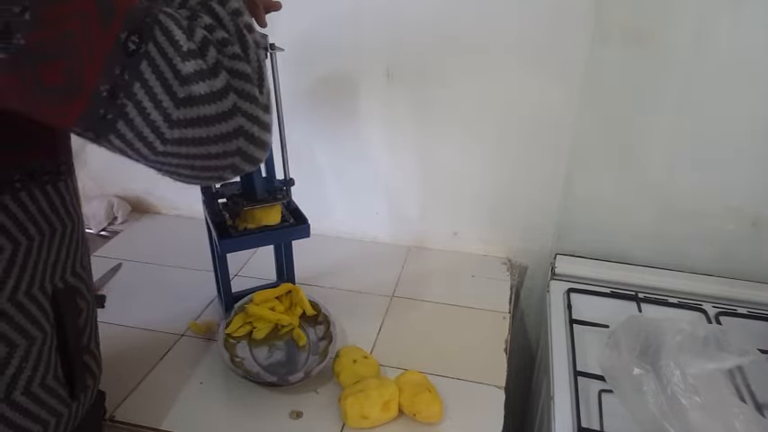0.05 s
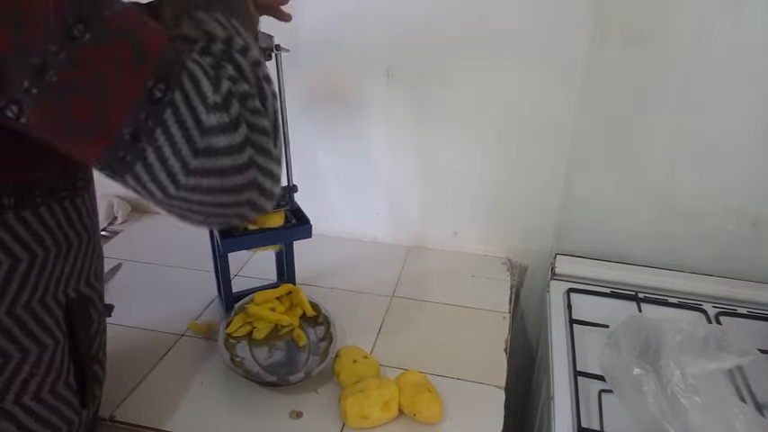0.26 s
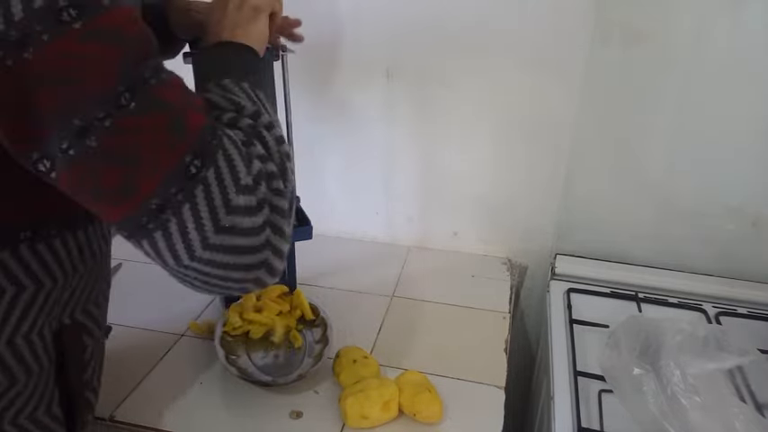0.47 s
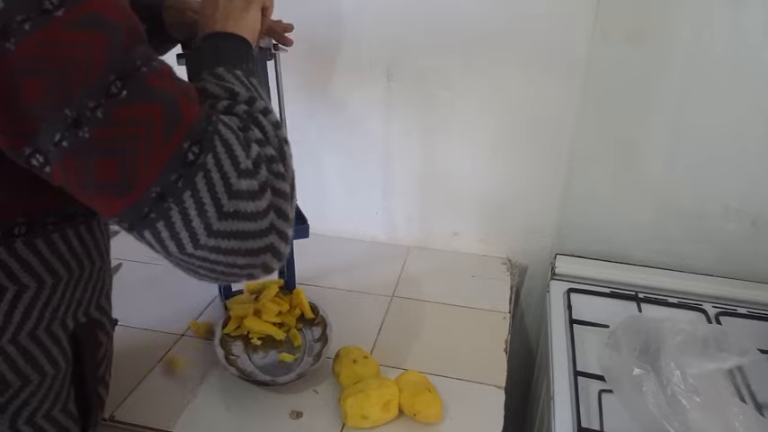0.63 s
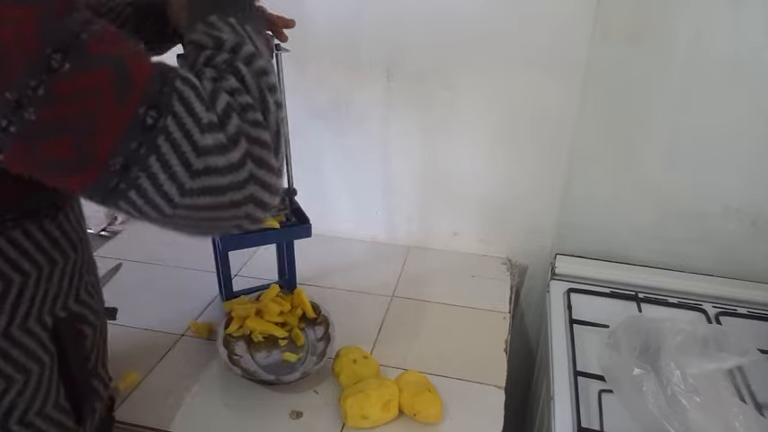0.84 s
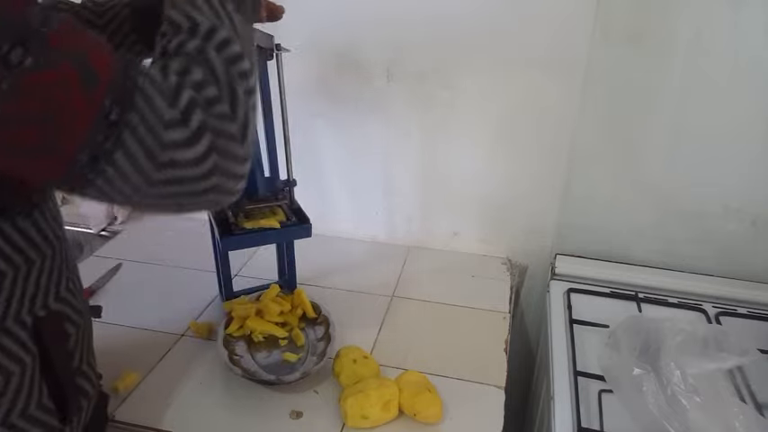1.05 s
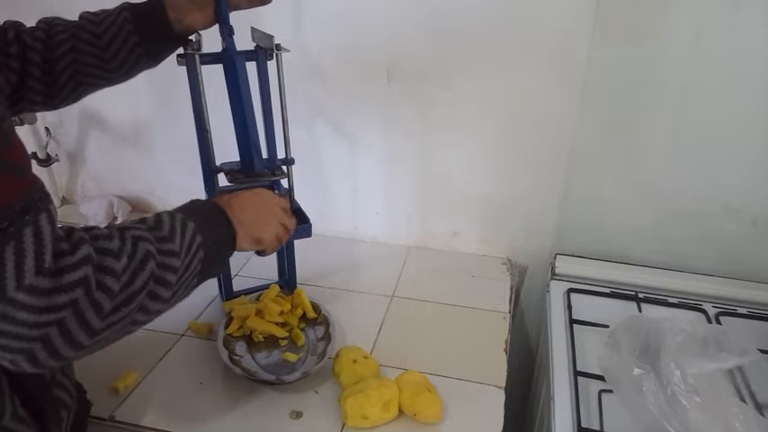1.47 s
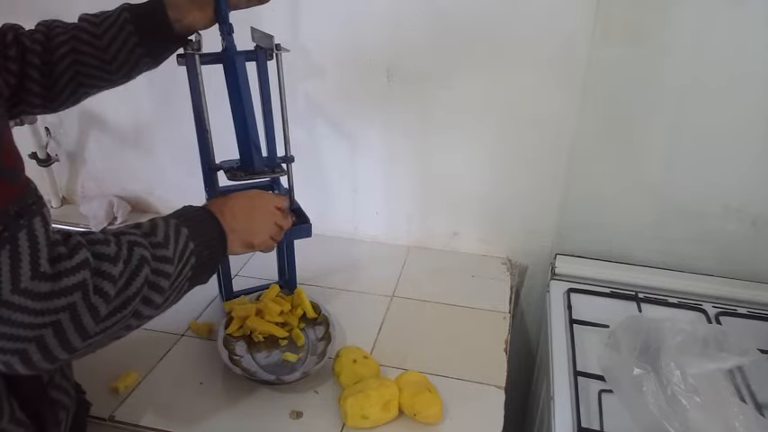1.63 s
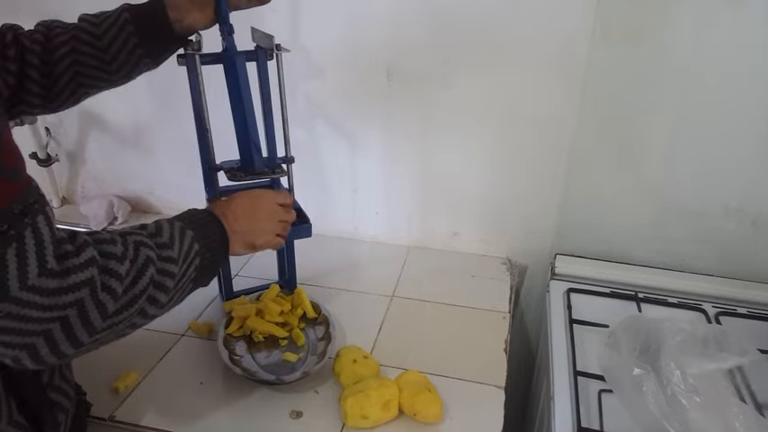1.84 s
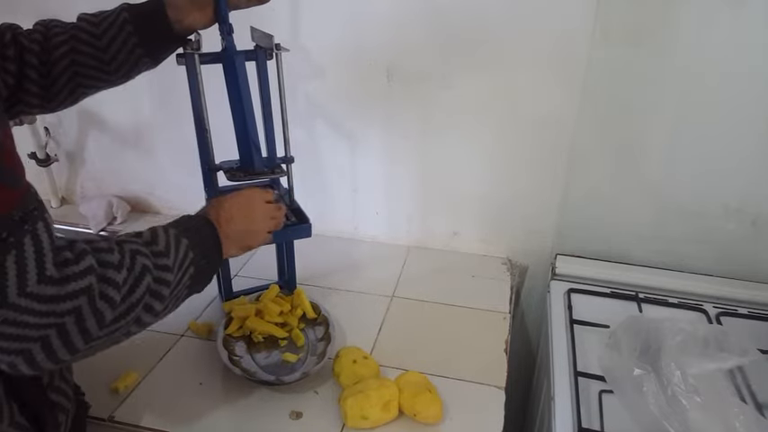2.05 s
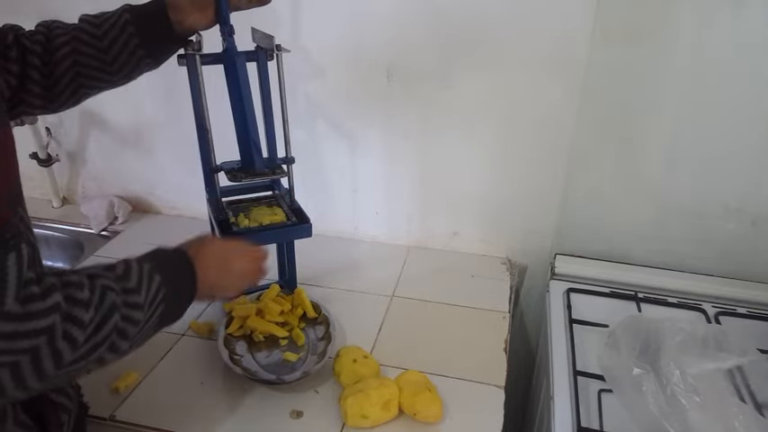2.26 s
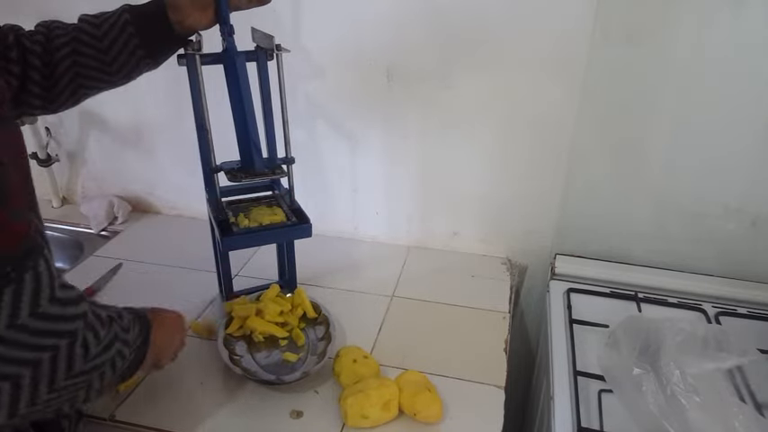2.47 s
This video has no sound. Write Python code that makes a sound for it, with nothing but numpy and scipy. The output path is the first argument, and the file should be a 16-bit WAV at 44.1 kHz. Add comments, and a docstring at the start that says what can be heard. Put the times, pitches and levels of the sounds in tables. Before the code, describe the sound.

A steel lever slicer forces a potato through its blades with a wet crunch and a thud. Chips drop into a steel bowl, then the lever lifts with a knock, bright click and scrape. An appliance hums faintly in the kitchen.

```python
"""A wet crunch over a groaning frame: a steel lever slicer forces a potato through its blade grid.
The blades ring, the pusher slams home and the chips drop into a steel bowl. The lever lifts with a
knock and a bright click, the pusher scraping up its singing guide rods; a hand picks at the wet slices.
A mains appliance hums throughout in the tiled kitchen."""
import sys
import numpy as np
from scipy import signal
from scipy.fft import rfft, irfft, next_fast_len
from scipy.io import wavfile
from scipy.ndimage import map_coordinates

SR = 44100
rng = np.random.default_rng(int(sys.argv[2]) if len(sys.argv) > 2 else 0)


def generate_wav(sig):
    """Save sig (samples, or channels by samples) to the path in sys.argv[1] as 16-bit PCM at SR."""
    pcm = np.round(np.clip(np.atleast_2d(sig).T, -1, 1) * 32767).astype(np.int16)
    wavfile.write(sys.argv[1], SR, pcm)


N = 110250
TIME = np.arange(N) / SR


def amp(db):
    """Decibels to gain."""
    return 10 ** (np.asarray(db) / 20)


def unit(x):
    """Scale to rms 1."""
    return x / np.sqrt(np.mean(x ** 2) + 1e-20)


def along(points, hz):
    """Read (f/Hz, value) points on a log frequency axis."""
    f, values = np.transpose(points)
    return np.interp(np.log(hz + 1), np.log(f + 1), values)


def curves(rows):
    """One automation curve for each column after the time."""
    times, *columns = np.transpose(rows)
    return [np.interp(TIME, times, column) for column in columns]


def gate(rows, release_s):
    """Opens at the first row; after the last it falls 60 dB per release_s."""
    return (TIME >= rows[0][0]) * amp(-60 * np.maximum(TIME - rows[-1][0], 0) / release_s)


def wobble(rate):
    """A smooth random curve, rate knots a second."""
    return map_coordinates(rng.standard_normal(int(N * rate / SR) + 4), [np.arange(N) * rate / SR])


def grains(per_s, scatter_db):
    """Random tiny ruptures or slips of uneven size."""
    ticks = (rng.random(N) < per_s / SR) * rng.choice([-1, 1], N)
    return unit(ticks * amp(scatter_db * np.clip(rng.standard_normal(N), -2, 2)))


def colour(x, eq):
    """Minimum-phase EQ through (f/Hz, level/dB) points."""
    size = 2 * next_fast_len(N)
    cepstrum = irfft(np.log(amp(along(eq, np.fft.rfftfreq(size, 1 / SR)))), size)
    cepstrum[1:size // 2] *= 2
    cepstrum[size // 2 + 1:] = 0
    return irfft(rfft(x, size) * np.exp(rfft(cepstrum)), size)[..., :x.shape[-1]]


def spread(pair):
    """Two unrelated signals as a diffuse field: narrow bass, wide treble."""
    # stereo width: f/Hz, side over mid/dB
    width = [(60, -19), (150, -12.5), (300, -7.5), (600, -5), (1200, -1), (4000, 0), (12000, 1.5)]
    side = colour(pair[1], width)
    return np.array([pair[0] + side, pair[0] - side]) / np.sqrt(2)


def kitchen(x, early_db, early_s, room_db):
    """Direct sound, a dense cluster of near reflections and the room's tail."""
    # reverb decay: f/Hz, t60/s
    room_t60 = [(100, 0.66), (250, 0.72), (600, .52), (1500, 0.31), (4000, 0.38), (12000, 0.25)]
    size = SR * 3 // 4
    t = TIME[:size]
    hz, frame_s, spectra = signal.stft(rng.standard_normal((2, size)), SR, nperseg=256)
    decay = amp(-60 * frame_s / along(room_t60, hz)[:, None])
    tail = signal.istft(spectra * decay, SR, nperseg=256)[1][:, :size]
    tail *= 1 - np.exp(-t / .006)
    near = rng.standard_normal((2, size)) * amp(-60 * t / early_s)
    response = spread(amp(room_db) * tail / np.linalg.norm(tail[0])
                      + amp(early_db) * near / np.linalg.norm(near[0]))
    response[:, 0] += 1  # direct sound
    response /= np.sqrt(np.sum(response ** 2) / 2)
    return signal.fftconvolve(x[None], response, axes=1)[:, :N]


def shifting_reflections(x, start_s, end_s, count, **room):
    """Crossfades through count random patterns of reflections, so the crunch has no fixed metallic ring."""
    blend = np.interp(TIME, [start_s, end_s], [0, count - 1])
    return sum(kitchen(x * np.sqrt(np.maximum(1 - abs(blend - k), 0)), **room) for k in range(count))


def blows(hits, eq, gain_db, **room):
    """Each contact is one sharp push, dispersed and coloured by what is struck."""
    pushes = np.zeros((2, N))
    for start_s, db in hits:
        push = np.zeros(N)
        push[int(start_s * SR)] = amp(db + gain_db)
        pushes += kitchen(push, **room)
    dispersion = .6  # all-pass: the lows trail the treble in the steel
    return colour(signal.lfilter([-dispersion, 1], [1, -dispersion], pushes), eq)


def ring(modes, start_s, rough_rad):
    """Decaying modes with unsteady phase, two slightly detuned sets spread in stereo."""
    t = np.maximum(TIME - start_s, 0)
    pair = np.zeros((2, N))
    for voice in pair:
        for hz, db, t60 in modes:
            detuned_hz = hz * (1 + rng.normal(0, .0018))
            phase = 2 * np.pi * detuned_hz * t + rough_rad * wobble(50)
            voice += amp(db - 60 * t / t60) * np.sin(phase)
    return spread(pair) * (1 - np.exp(-t / .0089))


def frame_note(rows, rough_rad, flutter_db):
    """A low resonance of the frame, driven unevenly by friction."""
    hz, db = curves(rows)
    envelope = gate(rows, release_s=.9) * amp(db + flutter_db * wobble(35))
    phase = 2 * np.pi * np.cumsum(hz) / SR + rough_rad * wobble(45)
    return np.sqrt(2) * envelope * np.sin(phase)


def room_tone():
    """Room air and the slightly unsteady hum of an appliance."""
    # hum partials: f/Hz, level/dB
    partials = [(53.8, -74.5), (150.7, -65), (296.1, -70.5), (344.5, -65.5), (393.0, -67.5), (441.4, -66.5),
                (489.9, -73), (2751, -86), (5109, -91), (5502, -98.5), (6191, -89.5), (7418, -90.5)]
    # air spectrum: f/Hz, level/dB
    air_eq = [(20, -38), (38, -21.5), (55, 1), (80, -11.5), (115, -6.5), (150, -9), (200, -4), (260, -11),
              (340, -13.5), (450, -7.5), (540, -17), (780, -14), (1030, -21.5), (1350, -17), (1730, -33),
              (2800, -30), (3800, -38.5), (6000, -33.5), (8000, -34), (9200, -43), (15800, -37)]
    hum = np.zeros(N)
    for hz, db in partials:
        level = np.sqrt(2) * amp(db + wobble(4.3))
        phase = 2 * np.pi * (hz * TIME + rng.random()) + .2 * wobble(9.5)
        hum += level * np.sin(phase)
    air = unit(spread(colour(rng.standard_normal((2, N)), air_eq)))
    return amp(.5) * hum + amp(-62) * air


def rod_scrape():
    """The pusher slides along its rods in a stream of tiny slips."""
    # scrape envelope: t/s, level/dB
    slide = [(0, -51.5), (.12, -68), (.19, -62), (.5, -45), (.58, -54), (.7, -51.5), (.78, -58),
             (.83, -52.5), (1.06, -46), (1.14, -59), (1.22, -59.5), (1.28, -57), (1.38, -59.5),
             (1.62, -66.5), (2.18, -71.5), (2.29, -61), (2.5, -77.5)]
    # rod spectrum: f/Hz, level/dB
    eq = [(500, -0.5), (750, 0), (1400, -4.5), (1600, 1), (1800, -1), (2100, -4), (2600, -6.5), (3300, -13),
          (4200, -17), (8000, -19), (12000, -51)]
    db, = curves(slide)
    slips = unit(colour(grains(per_s=6000, scatter_db=3), eq))
    return kitchen(amp(db + 1) * slips, early_db=12, early_s=.073, room_db=8)


def rod_song():
    """Rubbing feeds two bending modes of a guide rod; they drift as the pusher travels."""
    # first mode: t/s, f/Hz, level/dB
    glide = [(0, 1920, -57), (.1, 1850, -60), (.19, 1983, -87), (.75, 1768, -95), (.81, 1740, -51),
             (.86, 1803, -78), (1.0, 1804, -46), (1.12, 1850, -62), (1.2, 1710, -77), (1.275, 1709, -59.5),
             (1.37, 1860, -67.5), (1.5, 1996, -70.5), (1.65, 2000, -91)]
    overtone_ratio, overtone_db = 1.85, -8
    hz, db = curves(glide)
    phase = 2 * np.pi * np.cumsum(hz) / SR
    rubbed = lambda p: wobble(90) * np.cos(p) + wobble(90) * np.sin(p)
    pair = [rubbed(phase) + amp(overtone_db) * rubbed(overtone_ratio * phase) for _ in range(2)]
    return amp(db) * unit(spread(pair))


def rod_clinks():
    """The rod clinks in its guide."""
    # contacts: t/s, level/dB
    hits = [(.0238, -27), (.1007, -25.5), (.8061, -20.5)]
    # clink spectrum: f/Hz, level/dB
    eq = [(500, -28.5), (1150, -2), (1600, -17.5), (1900, 7.5), (2150, -15.5), (2600, -2.5), (3000, -26.5),
          (3600, -10), (4300, -23), (8000, -38), (15000, -45.5)]
    return blows(hits, eq, gain_db=16.5, early_db=11, early_s=.03, room_db=7.5)


def frame_rumble():
    """The stand shudders on the counter as the lever moves."""
    # shudder envelopes: t/s, boom level/dB, body level/dB
    shudder = [(.222, -52, -44), (.24, -37, -28.5), (.29, -39, -40.5), (.35, -38.5, -35),
               (.402, -39, -24.5), (.445, -43.5, -31.5), (.475, -40, -29), (.51, -35.5, -31.5),
               (.56, -50, -40.5), (.63, -51, -43), (.69, -45.5, -41.5), (.82, -56.5, -52.5),
               (.9, -54.5, -44), (1.02, -53, -42.5), (1.12, -59, -48.5), (1.23, -65, -58.5),
               (1.31, -61.5, -54.5), (1.6, -71, -66.5)]
    # deep boom: f/Hz, level/dB
    boom_eq = [(25, -40), (42, -21), (55, -5), (95, 13.5), (130, 7.5), (200, -41)]
    # low-mid body: f/Hz, level/dB
    body_eq = [(110, -52), (190, -1.5), (250, 0.5), (320, -0.5), (400, -9.5), (580, -9), (760, -22),
               (1400, -47.5)]
    boom_db, body_db = curves(shudder)
    shake = lambda eq: unit(spread(colour(np.array([grains(900, 4.5), grains(900, 3)]), eq)))
    boom = amp(boom_db - 2.5) * shake(boom_eq)
    body = amp(body_db - 1) * shake(body_eq)
    return (boom + body) * gate(shudder, release_s=.63)


def knocks():
    """Dull knocks: the pusher meets the potato, later the lever shifts in its loose joint."""
    # contacts: t/s, level/dB
    hits = [(.2250, -16), (.2370, -12.5), (.8617, -24), (.873, -13), (.8765, -13.5), (.8795, -9.5),
            (.886, -10.5)]
    # knock spectrum: f/Hz, level/dB
    eq = [(150, -26), (300, -9.5), (410, 9.5), (480, -6), (590, 10), (720, -0.5), (1000, 5), (1330, 2.5),
          (1500, -3.5), (1850, 0), (2400, -1.5), (2900, -7.5), (3500, -16.5), (4800, -22), (6200, -31),
          (8200, -28), (9500, -51), (15000, -47)]
    return blows(hits, eq, gain_db=17, early_db=10, early_s=.033, room_db=7.5)


def potato_crunch():
    """Cells tear and spit as the potato moves through the blades."""
    # crunch envelopes: t/s, tear level/dB, fizz level/dB
    cut = [(0.225, -53, -63.5), (0.234, -35, -44), (.256, -41.5, -43), (.3, -37.5, -43),
           (.335, -31.5, -44.5), (.365, -30, -38), (0.395, -32, -36.5), (0.406, -26.5, -30.5),
           (0.427, -35, -43.5), (.458, -43.5, -38.5)]
    # tearing flesh: f/Hz, level/dB
    tear_eq = [(300, -2.5), (550, -9), (850, -8.5), (1250, -1.5), (1750, 2), (2500, -1), (3400, -2),
               (4600, -14.5), (6000, -22.5), (8000, -35.5), (10500, -41)]
    # wet fizz: f/Hz, level/dB
    fizz_eq = [(2600, -31.5), (4500, -1.5), (6000, -6), (7000, -0.5), (8400, -4.5), (9300, -14.5),
               (11000, -15.5), (14600, -15), (15800, -20)]
    tear_db, fizz_db = curves(cut)
    tear = amp(tear_db - 1.5) * unit(colour(grains(per_s=1500, scatter_db=4), tear_eq))
    fizz = amp(fizz_db + 1.5) * unit(colour(grains(per_s=4000, scatter_db=5), fizz_eq))
    crunch = (tear + fizz) * gate(cut, release_s=.31)
    return shifting_reflections(crunch, cut[0][0], cut[-1][0], count=6,
                                early_db=8.5, early_s=.03, room_db=7)


def frame_groan():
    """The frame groans under the load of the cut."""
    # groan: t/s, f/Hz, level/dB
    glide = [(.228, 150.1, -40), (.262, 157, -35), (.31, 146.8, -32), (.36, 152.4, -38), (.42, 155.5, -33),
             (.48, 143.4, -39), (.56, 139.6, -47)]
    return frame_note(glide, rough_rad=.2, flutter_db=2)


def blade_ring():
    """The blades sing as the potato breaks through."""
    # blade modes: f/Hz, level/dB, t60/s
    modes = [(2550, -44, .5), (3310, -31.5, .5), (3530, -42.5, 0.44), (6550, -35, 0.37), (8230, -39.5, .3)]
    return ring(modes, start_s=.402, rough_rad=.15)


def pusher_slam():
    """The pusher hits its end stop and rattles; frame and counter thud."""
    # hit and rebounds: t/s, level/dB
    hits = [(0.4643, 0), (0.4686, -16.5), (0.4811, -16.5), (.504, -17)]
    # slam spectrum: f/Hz, level/dB
    eq = [(40, -26), (80, 12), (160, 1.5), (290, 15), (420, 4), (600, 8), (850, 0.5), (1500, 1), (2700, 0),
          (4000, -10.5), (5500, -12), (8000, -56), (15000, -51.5)]
    # frame and counter modes: f/Hz, level/dB, t60/s
    modes = [(60.7, -35, 1), (88, -37, .35), (242, -28.5, 0.12), (283, -26.5, 0.14), (317.5, -20, 0.11),
             (407.5, -20, .25), (550, -28.5, 0.47)]
    attack = blows(hits, eq, gain_db=17.5, early_db=-6, early_s=.046, room_db=-1.5)
    return attack + ring(modes, start_s=hits[0][0], rough_rad=.54)


def light_taps():
    """The linkage and the falling chips tap lightly."""
    # contacts: t/s, level/dB
    hits = [(.524, -10.5), (.562, -12), (.615, -22), (.6629, -16), (.696, -27), (.745, -23.5)]
    # tap spectrum: f/Hz, level/dB
    eq = [(150, -28), (500, 1), (1200, 6), (2000, 2), (2900, -2), (3550, 1), (4200, -12.5), (5000, -14.5),
          (8000, -24.5), (10000, -32.5), (15000, -38.5)]
    return blows(hits, eq, gain_db=11, early_db=9, early_s=.064, room_db=6.5)


def chip_drops():
    """Chips land in the steel bowl."""
    # landings: t/s, level/dB
    hits = [(.615, -46), (.7208, -27.5), (.8061, -32.5)]
    # bowl spectrum: f/Hz, level/dB
    eq = [(1000, -17), (1750, 1), (2300, -5), (4700, 2.5), (7000, -10), (7750, 7), (8600, -19),
          (11500, -8.5), (15000, -15)]
    return blows(hits, eq, gain_db=11.5, early_db=6, early_s=.06, room_db=10)


def return_groan():
    """Friction draws a softer, rougher note from the frame on the way up."""
    # groan: t/s, f/Hz, level/dB
    glide = [(.76, 88, -52), (.81, 103.6, -56), (.9, 132.8, -54.5), (1.02, 158.7, -45),
             (1.11, 182.4, -49.5), (1.19, 186.5, -70), (1.28, 160.5, -71), (1.33, 133.9, -55),
             (1.42, 144.7, -58), (1.55, 149.2, -60.5)]
    return frame_note(glide, rough_rad=.65, flutter_db=1)


def steel_click():
    """Steel strikes steel as the lever lifts, and rings brightly."""
    # contacts: t/s, level/dB
    hits = [(0.9869, -15.5), (0.9903, -16)]
    # click spectrum: f/Hz, level/dB
    eq = [(240, -32), (400, 4), (474, -11.5), (644, 4.5), (850, -27), (1090, -2), (1290, -8.5), (1830, 3.5),
          (2780, -8.5), (4550, -8), (5060, -13), (14200, -21.5), (15800, -37.5)]
    # steel modes: f/Hz, level/dB, t60/s
    modes = [(607, -48, 0.78), (1020, -57, 0.23), (1767, -44.5, 0.51), (2040, -41, .25), (2390, -33, 0.1),
             (2560, -46, 0.14), (3260, -60, 0.19), (4102, -59, .3), (4340, -43.5, 0.27), (5814, -60, 0.14)]
    attack = blows(hits, eq, gain_db=21, early_db=17.5, early_s=.084, room_db=14.5)
    return attack + ring(modes, start_s=hits[0][0], rough_rad=.86)


def hand_rustle():
    """A hand picks at the wet slices with a faint sticky rustle."""
    # rustle envelope: t/s, level/dB
    picking = [(1.9, -100), (1.95, -67), (1.98, -70.5), (2.02, -85.5), (2.09, -78), (2.16, -89),
               (2.28, -76.5), (2.36, -87), (2.5, -73.5)]
    # wet slices: f/Hz, level/dB
    eq = [(700, -2.5), (1500, -3.5), (2500, 0.5), (4500, -2), (8000, -6.5), (10000, -16), (14500, -13)]
    db, = curves(picking)
    rustle = unit(colour(grains(per_s=2500, scatter_db=3), eq))
    return kitchen(amp(db) * rustle, early_db=8, early_s=.038, room_db=4.5)


def scene():
    """One stroke of the slicer and its return."""
    cutting = potato_crunch() + frame_groan() + blade_ring()
    movement = frame_rumble() + rod_scrape() + return_groan() + rod_song()
    impacts = pusher_slam() + knocks() + steel_click() + rod_clinks() + light_taps() + chip_drops()
    return cutting + movement + impacts + hand_rustle() + room_tone()


def record(dry):
    """A brick-wall low-pass trims the very top of the mix."""
    top_hz = 15850
    size = next_fast_len(N + SR // 2)
    passband = np.fft.rfftfreq(size, 1 / SR) < top_hz
    return irfft(rfft(dry, size) * passband, size)[:, :N]


dry = scene()
out = record(dry)
generate_wav(out)
```